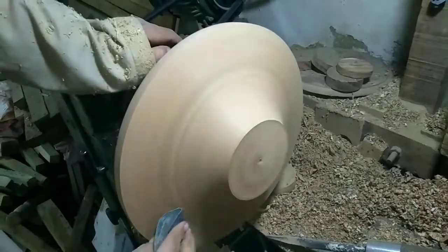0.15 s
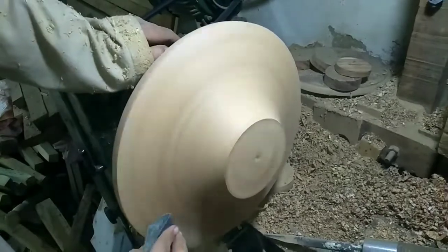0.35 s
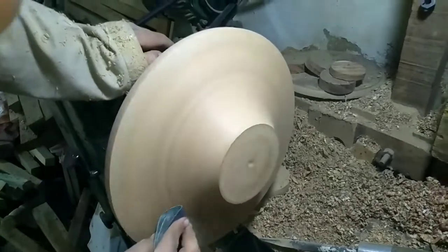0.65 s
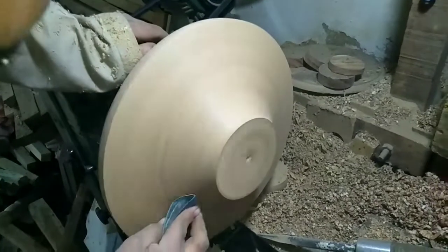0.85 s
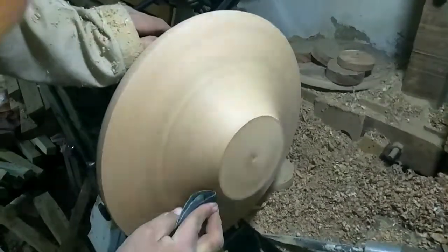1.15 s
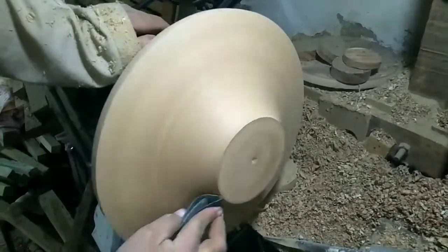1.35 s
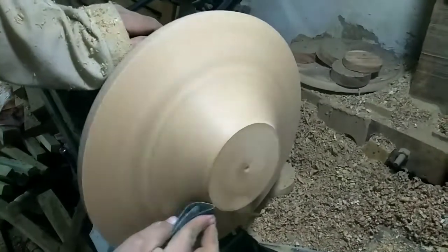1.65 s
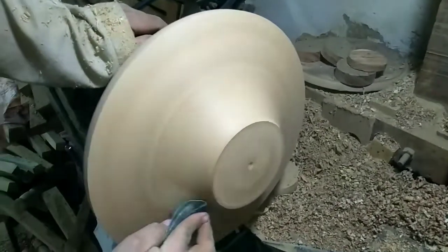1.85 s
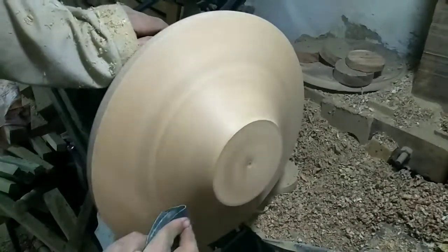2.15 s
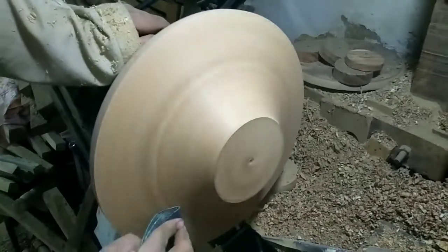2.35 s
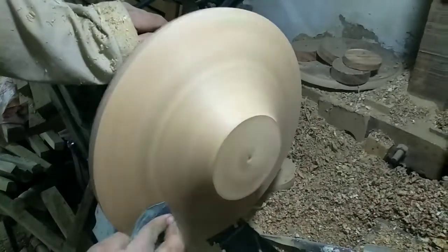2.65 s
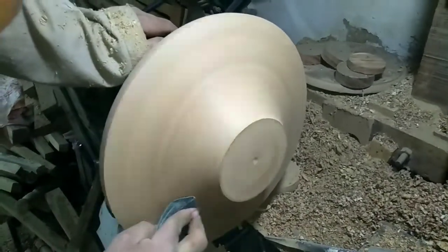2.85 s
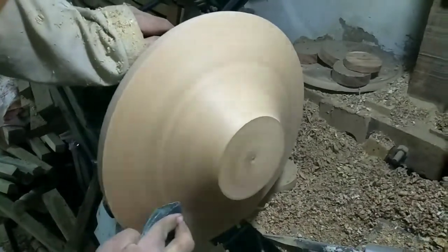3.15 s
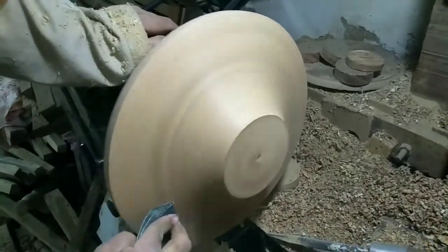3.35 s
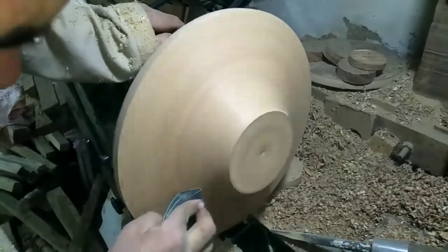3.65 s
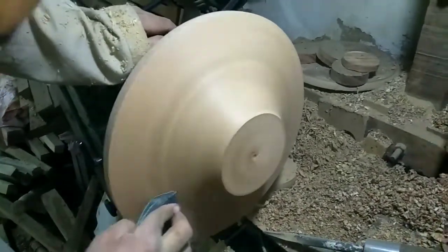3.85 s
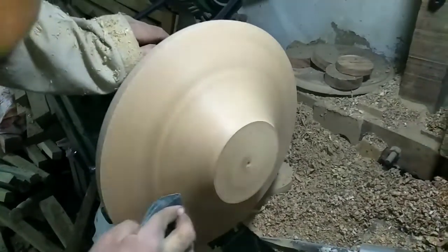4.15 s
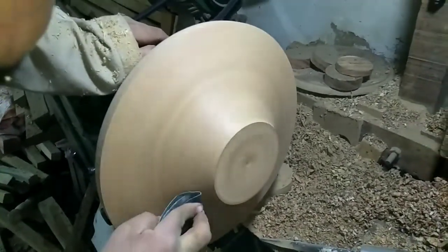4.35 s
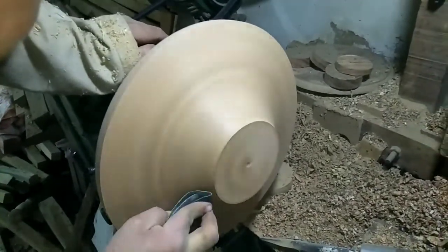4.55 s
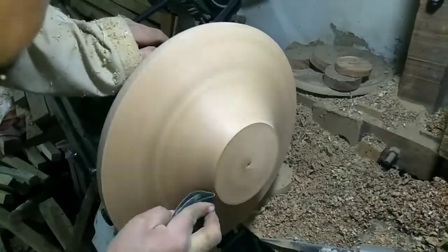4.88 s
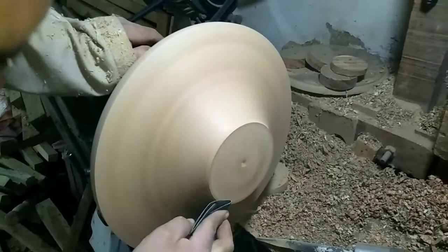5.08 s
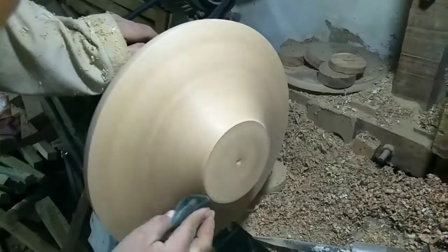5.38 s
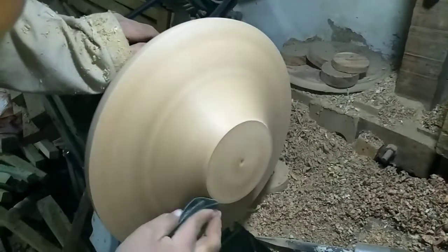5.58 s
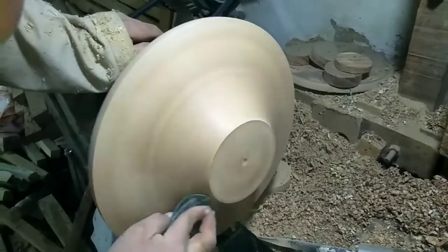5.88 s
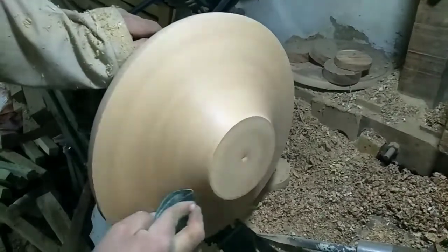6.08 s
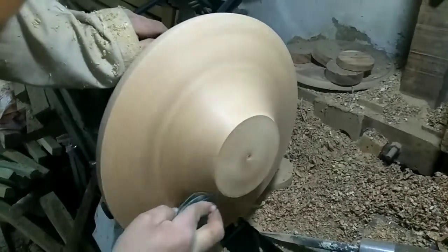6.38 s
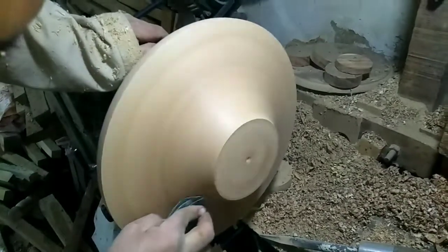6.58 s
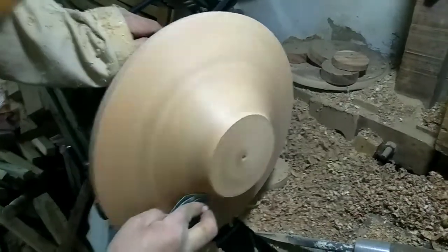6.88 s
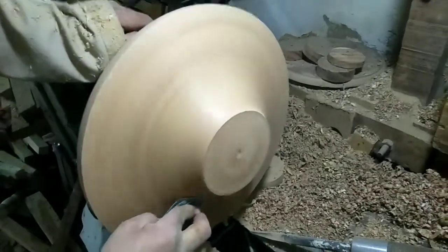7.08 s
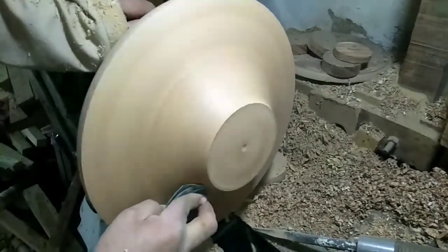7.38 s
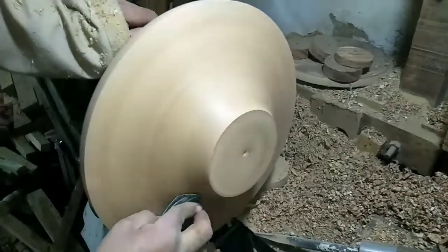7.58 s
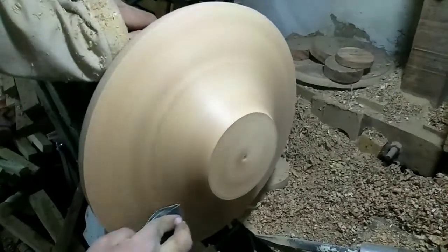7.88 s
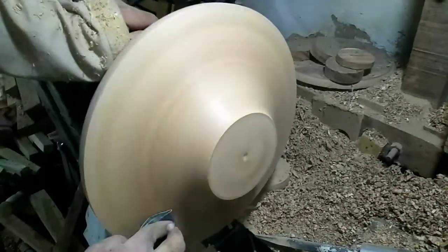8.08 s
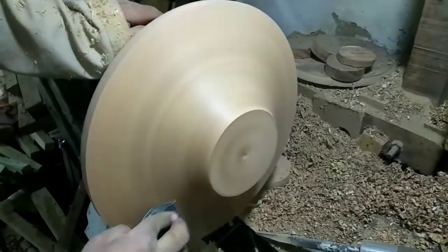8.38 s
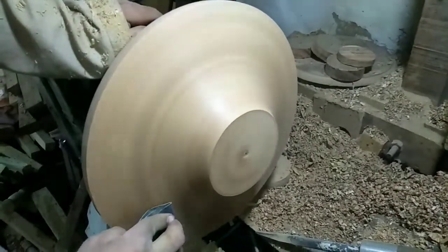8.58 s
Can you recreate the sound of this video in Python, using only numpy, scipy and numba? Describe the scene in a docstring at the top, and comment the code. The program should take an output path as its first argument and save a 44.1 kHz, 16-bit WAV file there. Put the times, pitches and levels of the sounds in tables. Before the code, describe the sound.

The sound is already under way at 0 s: dry sandpaper on a fast-spinning wooden bowl, a continuous bright hiss with a softer mid rasp, shivering about 43 times a second, over very faint lathe hum and bowl rumble. Near 0.85-1.1 s a breathy high whistle colours the hiss. From 1.2 to 1.8 s the rasp thins and the paper catches in several short scratchy scrapes. From 2 to 4 s it is smoother and fuller, swelling slightly around 3.5 s. From 4.2 s pressure grows and the airy whistle returns; at 4.6-5.3 s come tiny squeaks and sharp scrapes. The rasp is strong from 5.6 to 6.3 s, drops at 6.4, with a faint lower squeak near 6.8. It thins around 7.1 s, bursts briefly at 7.3, roughens suddenly at 7.8, then continues evenly, cut off at about 8.7 s. Close microphone, little room.

```python
"""In a wood workshop, folded sandpaper is hand-held on a wooden bowl turning about 21 times a second.
Random grit ticks, filtered into rasp, scratch and hiss, beat twice a turn as end grain passes.
Narrow resonances make the bowl and paper ring; the pinched fold whistles, the edge scrapes and squeaks.
Faint sines at ratios of the spindle speed are the lathe hum; filtered noise is the bowl's rumble."""
import sys
import numpy as np
from scipy import signal
from scipy.fft import rfft, irfft, next_fast_len
from scipy.io import wavfile
from scipy.ndimage import uniform_filter1d
from numba import njit

SR = 44100
rng = np.random.default_rng(int(sys.argv[2]) if len(sys.argv) > 2 else 0)


def persist_wave(psi):
    """Save psi, clipped to +-1, as 16-bit WAV."""
    counts = np.round(np.clip(psi, -1, 1) * 32767).astype(np.int16)
    wavfile.write(sys.argv[1], SR, np.atleast_2d(counts).T)


N = 384699
TIME = np.arange(N) / SR  # s

# the band in which each voice is levelled: name=(low [Hz], high [Hz])
BANDS = dict(rasp=(500, 1800), edge=(3300, 6300), fold=(7300, 8600), sheet=(9200, 12000),
         fine=(12800, 15400), rumble=(55, 180))


def undb(db):
    """Decibels to gain."""
    return 10 ** (np.asarray(db) / 20)


def curves(table):
    """Each column after time, joined by straight lines over the whole scene."""
    s, *columns = np.transpose(table)
    return [np.interp(TIME, s, column) for column in columns]


def walk(rate):
    """Random wander with unit spread, changing about rate times a second."""
    step = max(int(SR / rate), 2)
    held = np.repeat(rng.standard_normal(N // step + 1), step)
    wander = uniform_filter1d(held, step)[:N]
    return wander / wander.std()


def bell(s, length):
    """A smooth swell to 1 and back, centred on s."""
    return np.exp(-(2 * (TIME - s) / length) ** 2)


def colour(x, points, band):
    """Causal minimum-phase filter through (Hz, dB) points, scaled to unit rms inside the band."""
    size = next_fast_len(N // 2 + 4096) * 2
    f = np.arange(size // 2 + 1) * SR / size
    hz, db = np.transpose(points)
    log_f = np.log(f + 1)
    # beyond the end points the response keeps falling
    beyond = np.maximum(np.log(hz[0]) - log_f, 0) + np.maximum(log_f - np.log(hz[-1]), 0)
    response_db = np.interp(log_f, np.log(hz), db) - 20 * beyond
    cepstrum = irfft(np.log(undb(response_db)))
    # keeping only the forward half of the cepstrum makes the filter causal
    response = np.exp(rfft(2 * cepstrum[:size // 2], size))
    spectrum = rfft(x, size) * response
    inside = (f > band[0]) & (f < band[1])
    power = 2 * np.sum(np.abs(spectrum[inside]) ** 2) / size / N
    return irfft(spectrum)[:N] / np.sqrt(power)


@njit
def resonance(x, hz, width):
    """State-variable band-pass with a moving centre, gain 1 at the top."""
    y, band, low = np.empty(len(x)), 0., 0.
    for i in range(len(x)):
        g, damping = np.tan(np.pi * hz[i] / SR), width / hz[i]
        v = (band + g * (x[i] - low)) / (1 + g * (g + damping))
        band, low, y[i] = 2 * v - band, low + 2 * g * v, damping * v
    return y


def ring(drive, hz, width, waver_db=2.5, drift=0.011):
    """One narrow resonance at unit rms, its pitch and strength wavering with the fingers."""
    centre = hz * (1 + drift * walk(22)[:len(drive)])
    once = resonance(drive, centre, float(width))
    y = resonance(once, centre, 0.84 * width)
    y = y * undb(waver_db * walk(50)[:len(drive)])
    return y / y.std()


def grit(per_second, spread_db):
    """Ticks of single grains catching the wood: many small, a few large."""
    hit = rng.random(N) < per_second / SR
    size = undb(spread_db * np.minimum(rng.standard_exponential(N), 5))
    ticks = hit * size * rng.choice([-1, 1], N)
    return ticks / ticks.std()


def bite(turns, chatter, grain_db, wobble_db, chatter_db, flutter):
    """Grit bites unevenly: end grain passes twice a turn, the bowl wobbles and the paper chatters."""
    end_grain_s = 0.02  # when the end grain first meets the paper
    angle = 2 * np.pi * (turns - np.interp(end_grain_s, TIME, turns))
    end_grain = np.cos(2 * angle) - .3 * np.cos(4 * angle)
    figure = 1 + .3 * walk(5)  # the strength of the grain beat wanders
    uneven = chatter + 0.53 * walk(130)  # each part of the contact also slips on its own
    db = grain_db * end_grain * figure + wobble_db * np.cos(angle) + chatter_db * uneven
    buzz = np.sin(2 * np.pi * 172.27 * TIME)
    gain = undb(db) * (1 - flutter * buzz)  # a fast, even flutter
    return gain / np.sqrt(np.mean(gain ** 2))


def swells_and_dips():
    """The level swells or dips briefly along a bell; gives the dB on the hiss and on the rasp."""
    # brief swells (+) and dips (-) of hiss and rasp
    # (centre time [s], length [s], hiss change [dB], rasp change [dB])
    level_swells = [ (0, 0.086, -4.5, -10), (0.997, 0.02, 0.5, 9.5), (1.355, 0.066, -0.5, 6),
                    (1.413, .06, -2.5, -2.5), (1.53, .04, -1, 3), (1.666, 0.031, -2, 6),
                    (1.798, 0.011, 0, 6.5), (2.534, 0.054, -1, -3.5), (2.958, 0.09, 0.5, 1.5),
                    (3.383, .05, -1, -0.5), (3.516, 0.056, 3.5, 1), (3.65, 0.094, 3.3, 3.5),
                    (4.356, 0.078, -2, -2), (5.09, 0.045, 1, -1), (5.165, 0.055, -5.5, 3),
                    (5.23, 0.057, 1, 2.5), (5.28, 0.049, -2.5, -4.5), (5.514, 0.029, 1.5, -3),
                    (6.597, 0.066, 0.5, 3.5), (6.755, .05, 2.2, 0.5), (6.912, 0.039, -2, -2),
                    (7.11, .06, -0.5, 6), (7.29, 0.083, 2, 1), ]
    hiss, rasp = np.zeros(N), np.zeros(N)
    for s, length, hiss_db, rasp_db in level_swells:
        swell = bell(s, length)
        hiss += hiss_db * swell
        rasp += rasp_db * swell
    return hiss, rasp


def stiffen(x, foot):
    """Near the thick foot the wall hardly flexes, so the band around 320 Hz sinks."""
    for _ in range(2):
        x = x - 0.55 * foot * resonance(x, np.full(N, 320.), 300.)
    return x


def lathe(turns, swell_db, foot, pressure):
    """Imbalance and motor hum; the drag of the paper makes the bowl rumble."""
    # lathe hum; the odd ratio is the belt-driven motor (multiple of spindle speed, level [dB])
    hum_tones = [(1.001, -74.5), (2, -72.5), (3.31, -76.5)]
    # colour of the rumble (frequency [Hz], relative density [dB])
    rumble_colour = [(5, 17), (15, 4), (30, -2), (55, -4.5), (95, -2), (130, -2), (190, -5), (280, -19),
                     (600, -33.5)]
    # level of the bowl's low rumble before the swells (time [s], level [dB])
    rumble_level = [(0, -66), (.4, -70.5), (1.6, -67.5), (3.4, -67.5), (4.5, -69), (6.2, -65.5),
                    (6.45, -72), (7.2, -74), (7.85, -68), (8.72, -71)]
    hum = np.zeros(N)
    for multiple, db in hum_tones:
        level = np.sqrt(2) * undb(db + 0.88 * walk(3))  # the table gives rms
        hum += level * np.cos(2 * np.pi * multiple * turns)
    hum *= undb(.6 * pressure)  # a firmer grip loads the spindle
    drag = bite(turns, walk(40), grain_db=3.0, wobble_db=0.0, chatter_db=1.0, flutter=0)
    rumble = colour(rng.standard_normal(N) * drag, rumble_colour, BANDS["rumble"])
    rumble_db = curves(rumble_level)[0] + 0.54 * swell_db  # follows the swells of the rasp
    return hum + stiffen(rumble, foot) * undb(rumble_db)


def sanding(turns, rasp_db, swell_db, foot, pressure):
    """Wood and paper together, hollowed by the hand and glancing off it, with the grip's resonances."""
    # the hollow of the hand swallows one band (time [s], centre [Hz], depth [0-1])
    hand_hollow = [(0, 5260, .55), (.6, 5100, .5), (1.5, 5230, .35), (2.2, 5500, 0.3), (3, 5560, .65),
                   (4.05, 5900, 0.4), (4.6, 5280, 0.3), (5.1, 6000, .45), (5.5, 5300, 0.4),
                   (6.8, 5200, 0.6), (7.2, 5170, .8), (7.35, 5300, 0.3), (8.2, 5750, .55),
                   (8.72, 5700, .65)]
    unsteady_db = swell_db + 0.14 * walk(22)  # the hand trembles a little
    chatter = 0.42 * walk(130)
    foot_grain_db = 2 * foot  # the end grain beats harder near the foot
    on_paper = bite(turns, chatter, grain_db=0.8 + foot_grain_db, wobble_db=-0.05,
                    chatter_db=1.97, flutter=0.17)
    hiss = bowl_rasp(turns, chatter, rasp_db, foot, pressure)
    hiss = hiss + paper_hiss(turns, chatter, on_paper, unsteady_db, foot, foot_grain_db, pressure)
    hollow_hz, depth = curves(hand_hollow)
    hollow_hz = hollow_hz * (1 + 0.025 * walk(10))  # the fingers never hold quite still
    cupped = np.clip(depth + 0.097 * walk(8.2), 0, .9)  # the hollow opens and closes
    hiss = hiss - cupped * resonance(hiss, hollow_hz, 510.0)
    hiss = hiss + whistle(turns, chatter) + catches()
    ring_drive = grit(30000, 1.7) * on_paper * undb(unsteady_db)
    foot_gain = foot * undb(pressure)  # these modes ring harder under pressure
    return glance(hiss) + grip_rings(ring_drive, foot_gain, fade_s=0.051)


def bowl_rasp(turns, chatter, rasp_db, foot, pressure):
    """Coarse grains shake the wall of the bowl, brighter under a firm hand and thinner near the foot."""
    # colour of the rasp (frequency [Hz], relative density [dB])
    rasp_colour = [(120, -8.5), (220, -4), (310, -4), (480, 0), (750, -0.5), (1500, -1), (2100, -2.5),
                   (2800, -7), (3600, -13), (5500, -31)]
    rough = bite(turns, chatter + 1.54 * walk(500), grain_db=2.0, wobble_db=0.43,
                 chatter_db=1.4, flutter=0.09)
    rasp = colour(grit(11000, 2.13) * rough, rasp_colour, BANDS["rasp"])
    rasp = rasp * undb(rasp_db - 1.5 * foot)  # stiff wood near the foot rasps less
    bright_gain = undb(0.46 * pressure * (1 - foot))
    rasp = rasp + (bright_gain - 1) * resonance(rasp, np.full(N, 2500.), 1500.)
    return stiffen(rasp, foot)


def paper_hiss(turns, chatter, on_paper, unsteady_db, foot, foot_grain_db, pressure):
    """Finer grains scratch and hiss in the paper; edge, fold and sheet grow with hand pressure."""
    # colours of the paper's contact, low to high (frequency [Hz], relative density [dB])
    edge_colour = [(900, -14), (2000, -1), (3200, 1), (4700, 2.5), (6000, 3.5), (6800, 4), (7600, -6.5),
                   (9500, -29)]
    fold_colour = [(5500, -31.5), (6400, -12), (6900, -4.5), (7400, 1.5), (7900, 1.5), (8250, 1),
                   (8700, -2.5), (9300, -5), (11000, -37)]
    sheet_colour = [(5500, -22), (7500, -4), (9000, -3), (10000, 1), (11800, 0), (13000, -10), (16000, -12)]
    fine_colour = [(10000, -23.5), (12000, -13), (12700, -7.5), (13200, -4), (14200, -4.5), (14900, -3),
                   (15500, -2)]
    # level of the finest hiss before the swells (time [s], level [dB])
    fine_level = [(0, -50.5), (.65, -49.5), (.95, -51.5), (1.32, -52.5), (1.36, -46), (1.41, -51.5),
                  (1.9, -50.5), (2.15, -49), (3.7, -49.5), (4.85, -51), (5, -54.5), (5.08, -50),
                  (5.3, -49.5), (7.1, -51.3), (7.95, -50), (8.72, -50.5)]
    # near the foot the edge digs into the curve and judders
    foot_db = 2 * foot + 1.5 * foot * walk(60)
    edge_db = -58 + 0.91 * pressure + 0.73 * unsteady_db + foot_db
    fold_db = -55.5 + 1.32 * pressure + unsteady_db + .5 * walk(45)
    sheet_db = -58 + 0.89 * pressure + unsteady_db
    fine_db = curves(fine_level)[0] + 0.5 * unsteady_db + 0.79 * walk(12)
    on_edge = bite(turns, chatter, grain_db=0.5, wobble_db=0.25, chatter_db=2.0, flutter=0.12)
    on_tips = bite(turns, chatter, grain_db=1.0 + foot_grain_db, wobble_db=0.0,
                   chatter_db=2.0, flutter=0.23)
    edge = colour(grit(30000, 1.5) * on_edge, edge_colour, BANDS["edge"]) * undb(edge_db)
    fold = colour(grit(30000, 0.83) * on_paper, fold_colour, BANDS["fold"]) * undb(fold_db)
    sheet = colour(grit(30000, 3.0) * on_paper, sheet_colour, BANDS["sheet"]) * undb(sheet_db)
    fine = colour(grit(30000, 0.62) * on_tips, fine_colour, BANDS["fine"]) * undb(fine_db)
    return edge + fold + sheet + fine


def glance(x):
    """A weak reflection off the moving hand makes the colour of the hiss drift."""
    lag_s = 0.000903 * (1 + 0.195 * walk(1.5))
    return x + undb(-20) * np.interp(TIME - lag_s, TIME, x)


def whistle(turns, chatter):
    """The pinched fold sings in a full band of hiss, chopped by the end grain and the chatter."""
    # the whistle of the fold (time [s], centre [Hz], level [dB])
    fold_whistle = [(0, 7930, -61), (.78, 8200, -62), (.85, 7860, -52), (.97, 7800, -56), (1.11, 7800, -51),
                    (1.19, 8000, -69), (4.1, 8160, -68), (4.23, 7840, -54.5), (4.4, 7800, -55),
                    (4.5, 7980, -49), (4.7, 8100, -54), (4.76, 7900, -56), (4.9, 8000, -49.5),
                    (5.15, 8240, -62), (5.3, 8250, -51.5), (5.55, 8150, -58), (5.75, 8020, -50),
                    (6.05, 7850, -62), (6.26, 7950, -50), (6.36, 7950, -70)]
    hz, db = curves(fold_whistle)
    chop = bite(turns, chatter, grain_db=1.5, wobble_db=0.5, chatter_db=1.5, flutter=0.094)
    return ring(grit(20000, 1.2) * chop, hz, 760, waver_db=1.5, drift=0.012) * undb(db)


def grip_rings(drive, foot_gain, fade_s):
    """Grit excites narrow resonances: one set near the foot, others for as long as a grip lasts."""
    # what rings when the paper works near the foot
    # (centre [Hz], width [Hz], level before the foot gain [dB])
    foot_modes = [(640, 170, -66.5), (1604, 110, -64), (2000, 290, -62), (3780, 410, -66), (4450, 520, -63),
                  (5560, 310, -67.5), (7200, 490, -70)]
    # resonances of paper and bowl that come and go with the grip
    # (start [s], end [s], centre [Hz], width [Hz], level [dB])
    grips = [ (0, 1.17, 108, 35, -70.5), (1.179, 1.82, 96, 38, -64.5), (2.0, 3.85, 14860, 820, -57),
             (2.45, 3.0, 4760, 400, -66), (2.535, 2.78, 1560, 320, -61), (3.44, 3.73, 4780, 320, -64),
             (4.5, 4.71, 4340, 360, -61), (4.5, 5.5, 2160, 380, -72), (4.9, 5.1, 4220, 380, -64),
             (5.0, 5.13, 5490, 300, -59.5), (5.05, 5.3, 75, 25, -64), (5.124, 5.44, 6950, 900, -54),
             (5.19, 5.36, 4240, 240, -58.5), (5.541, 5.64, 2070, 300, -56), (5.567, 6.335, 2950, 900, -62),
             (5.667, 6.34, 2120, 340, -61), (6.425, 7.502, 3050, 750, -63), (6.443, 8.7, 6830, 780, -61.5),
             (6.52, 7.01, 2130, 190, -62), (6.728, 7.0, 3110, 380, -65), (7.1, 7.44, 2100, 420, -64),
             (7.18, 7.3, 3050, 600, -63), (7.25, 7.335, 2100, 2600, -53.5), (7.26, 7.43, 7650, 1100, -56), ]
    out = foot_gain * sum(undb(db) * ring(drive, hz, width) for hz, width, db in foot_modes)
    for start, end, hz, width, db in grips:
        held = np.clip(np.minimum(TIME - start, end - TIME) / fade_s + .5, 0, 1)
        on = held > 0
        out[on] += undb(db) * held[on] * ring(drive[on], hz, width)
    return out


def catches():
    """Where the paper catches, it scrapes in a bright burst of grit or squeaks on a short note."""
    # the paper's edge catches in the curve of the foot and scrapes
    # (centre time [s], length [s], level [dB], extra level on the three low modes [dB])
    scrapes = [ (1.228, .025, -56, 4), (1.277, .022, -53, 4), (1.45, .016, -52, 2), (1.472, .016, -49, -2),
               (1.493, .02, -50, -1), (1.6, .04, -52, 4), (1.637, .018, -47, -1), (1.705, 0.031, -50, 4.5),
               (1.75, .016, -48, -3), (4.693, .025, -49, -2), (4.875, .012, -51, 1), (4.896, .012, -48, -1),
               (5.018, .012, -51, 2), (5.038, 0.015, -42, -6), (5.11, .03, -47, -4),
               (5.204, 0.013, -41, -7), (5.25, .022, -45, -3), ]
    # what a scrape rings with (centre [Hz], width [Hz], relative level [dB])
    scrape_modes = [(3750, 570, -10.5), (4500, 750, -6.5), (5670, 790, -7.5), (7300, 900, -1.5)]
    # the paper sticks and squeaks
    # (centre time [s], length [s], pitch [Hz], glide [Hz per s], level [dB])
    squeaks = [ (4.64, .025, 4380, 0, -51), (4.927, .03, 4300, -1000, -57), (4.968, .014, 4280, 0, -56),
               (4.99, 0.019, 4310, 500, -44), (5.019, .018, 4220, -6000, -48),
               (5.065, .025, 4130, -1500, -57), (5.202, .025, 4300, 0, -55), (5.245, .03, 4260, -1000, -57),
               (5.31, .05, 4260, -500, -57.5), (6.782, .07, 2150, -300, -53),
               (6.968, .07, 2130, 298, -58.5), (7.13, .04, 2140, 0, -61), ]
    drive = grit(12000, 1.2)
    high, low = np.zeros(N), np.zeros(N)
    for s, length, db, coarse_db in scrapes:
        burst = undb(db) * bell(s, length)
        high += burst
        low += undb(coarse_db) * burst
    *low_modes, top_mode = [undb(db) * ring(drive, hz, width, waver_db=0.5)
                            for hz, width, db in scrape_modes]
    out = low * sum(low_modes) + high * top_mode
    for s, length, hz, glide, db in squeaks:
        on = np.abs(TIME - s) < 2 * length
        pitch = hz + glide * (TIME[on] - s)
        squeak = ring(drive[on], pitch, 200, waver_db=3.5, drift=0.006)
        out[on] += undb(db) * bell(s, length)[on] * squeak
    return out


def scene():
    """Sanding and lathe share one spindle and one hand; both channels carry the same sound."""
    # lathe speed under the hand (time [s], speed [turns per s])
    spindle = [(0, 21.3), (1, 21.27), (1.7, 21.44), (2.5, 21.29), (3.4, 21.39), (4.2, 21.18), (5.3, 21.52),
               (6.3, 21.38), (8.7, 21.34)]
    # how firmly the hand holds the paper (time [s], pressure about the usual grip [dB])
    grip_pressure = [(0, -3.5), (.5, -4), (.85, -1), (1.25, 0.9), (1.68, 3), (1.95, -0.5), (2.5, -2),
                     (2.9, -0.5), (3.35, -2.5), (3.65, -1.5), (3.95, -2.5), (4.2, 0.5), (4.6, 3),
                     (6.25, 1.5), (6.42, 0.2), (7.6, 0), (7.9, -0.5), (8.72, 0)]
    # nearness of the paper to the thick foot of the bowl (time [s], share [0-1])
    foot_nearness = [(1.11, 0.2), (1.16, 0.5), (1.23, 0.85), (1.31, 0.8), (1.345, 0.3), (1.385, 0),
                     (1.42, 0.8), (1.48, 0.8), (1.53, 0.28), (1.77, 0.6), (1.86, 0.1), (4.88, 0.01),
                     (4.98, 0.75), (5.1, 0.67), (5.26, 0.48), (5.38, 0.07), (6.3, 0.05), (6.42, .22),
                     (7.1, 0.28), (7.65, 0.12), (7.78, .02)]
    # level of the bowl's rasp before the swells (time [s], level [dB])
    rasp_level = [(0, -58), (1.12, -57.5), (1.16, -62.5), (1.26, -64), (1.5, -60), (1.75, -60.5),
                  (2.1, -55), (3.3, -57.5), (3.95, -57), (4.5, -56), (5, -58.5), (5.33, -57.5), (5.65, -54),
                  (6.3, -55.3), (6.42, -59.5), (6.75, -56.5), (7.15, -63), (7.28, -55), (7.68, -59.5),
                  (7.74, -59), (7.79, -52.8), (8.1, -57), (8.72, -57.5)]
    turns = np.cumsum(curves(spindle)[0]) / SR
    pressure = curves(grip_pressure)[0]
    foot = np.clip(curves(foot_nearness)[0], 0, 1)
    hiss_swell_db, rasp_swell_db = swells_and_dips()
    rasp_db = curves(rasp_level)[0] + rasp_swell_db
    sound = lathe(turns, rasp_swell_db, foot, pressure)
    sound = sound + sanding(turns, rasp_db, hiss_swell_db, foot, pressure)
    return np.array([sound, sound])


def record(dry):
    """The recorder cuts the top steeply above 15560 Hz."""
    low_pass = signal.ellip(14, .1, 80, 15560, fs=SR, output="sos")
    return signal.sosfilt(low_pass, dry)


dry = scene()
out = record(dry)
persist_wave(out)
```